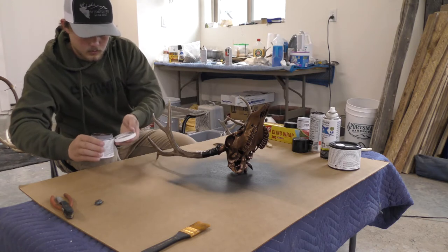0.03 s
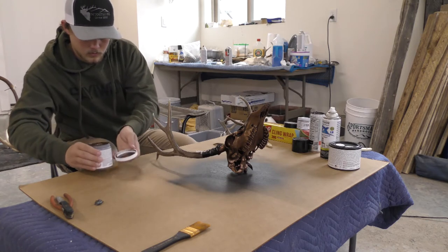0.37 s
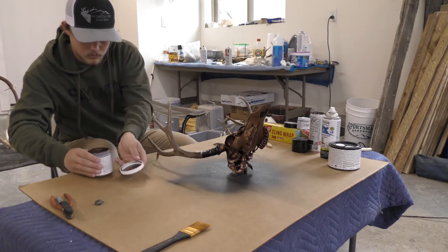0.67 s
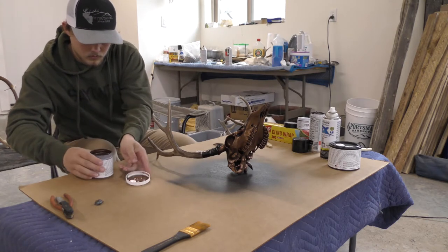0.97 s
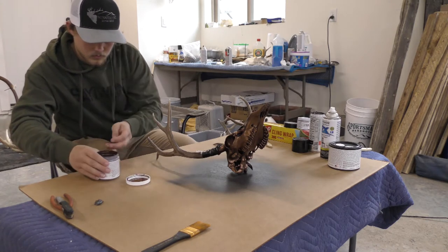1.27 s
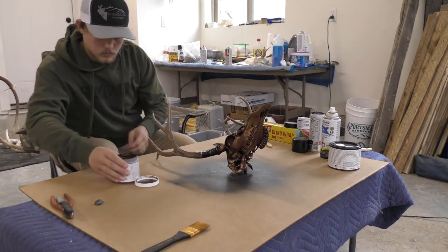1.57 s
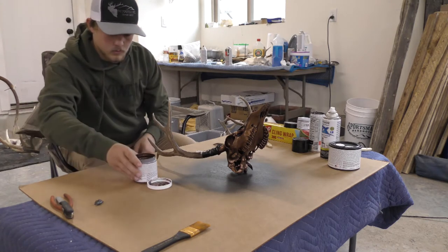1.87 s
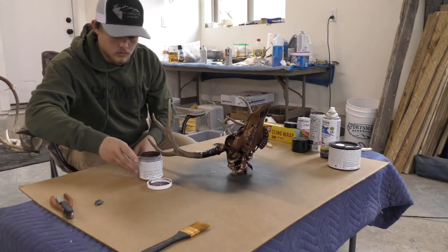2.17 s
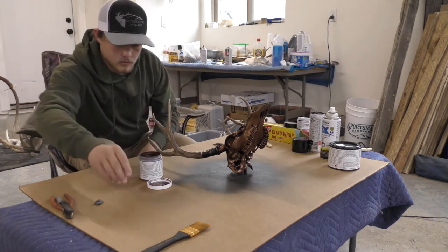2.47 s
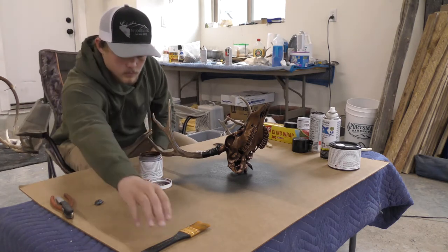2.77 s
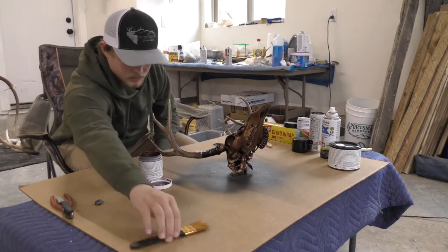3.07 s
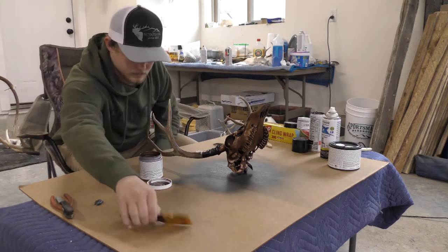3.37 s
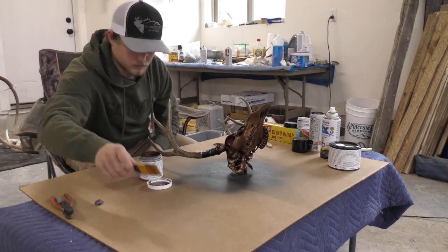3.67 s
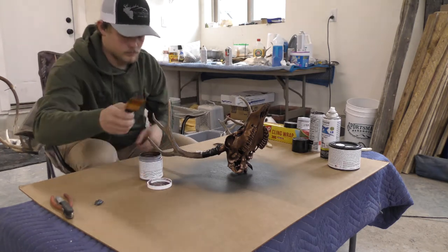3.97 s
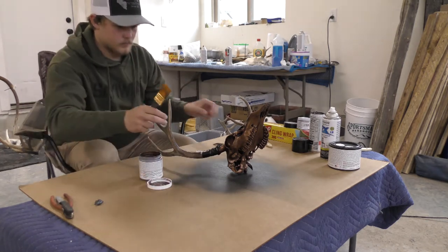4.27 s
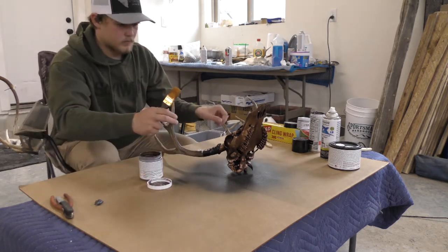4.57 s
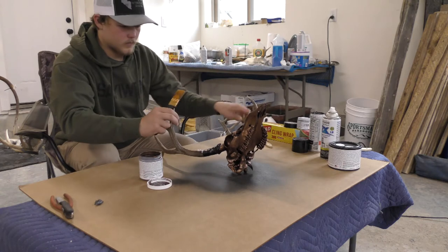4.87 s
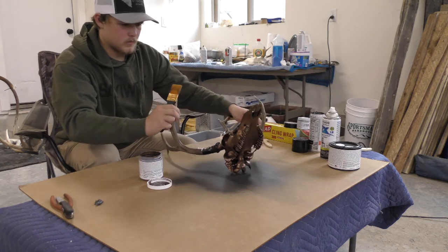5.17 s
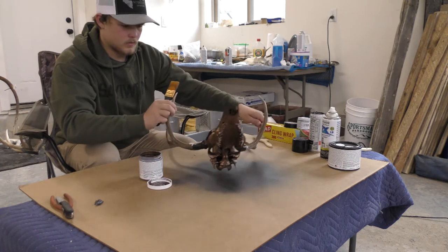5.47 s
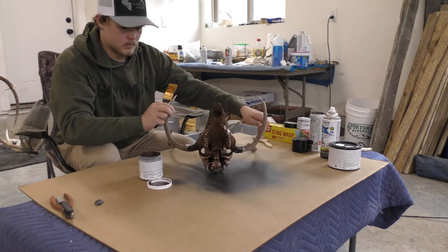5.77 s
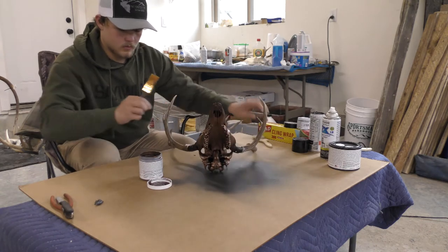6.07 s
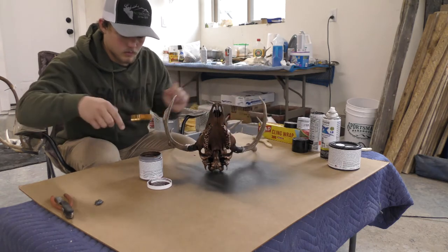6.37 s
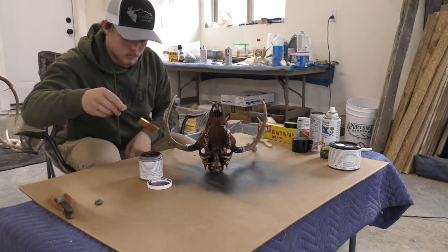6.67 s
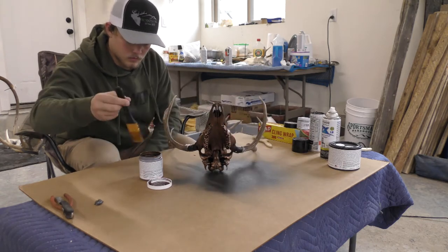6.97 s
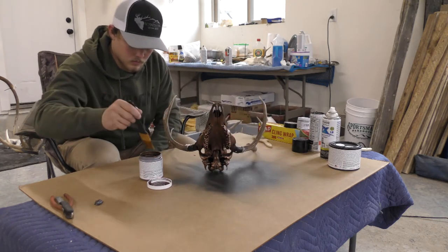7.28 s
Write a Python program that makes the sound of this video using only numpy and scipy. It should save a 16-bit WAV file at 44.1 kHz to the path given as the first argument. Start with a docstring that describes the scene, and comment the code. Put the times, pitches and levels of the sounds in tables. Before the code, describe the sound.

A paint tin and lid knock onto a paper-covered table, followed by sliding, a brush being picked up and an antlered skull scraping round.

```python
"""Over a faint fan, a small paint tin and its lid knock down on a paper-covered table in a bare workshop.
The tin slides aside, a sleeve reaches over, a brush is dragged off the paper and a boot scuffs;
then an antlered skull scrapes round, knocks and rocks the table.
Impacts excite the modes of the tabletop, and sliding friction makes noise from many tiny slips.
The room reverberates after every knock, and a limiter ducks the loudest ones."""
import sys
import numpy as np
from scipy import signal
from scipy.fft import rfft, irfft, next_fast_len
from scipy.io import wavfile
from scipy.ndimage import minimum_filter1d

SR = 44100
rng = np.random.default_rng(int(sys.argv[2]) if len(sys.argv) > 2 else 0)


def transcribe(u):
    """Save the signal u as a 16-bit wav file named by the first command-line argument.

    u: samples, shape (n,) or (channels, n), limited to [-1, 1]; the rate is SR.
    q: integer samples, one column per channel.
    """
    v = np.clip(np.atleast_2d(u).T, -1, 1)
    q = np.round(v * 32767).astype(np.int16)
    wavfile.write(sys.argv[1], SR, q)


N = 328086


def amp(db):
    """Amplitude ratio of a level in decibels."""
    return 10 ** (np.asarray(db) / 20)


def unit(x):
    """Normalisation to rms 1."""
    return x / np.sqrt(np.mean(x ** 2) + 1e-20)


def along(points, hz):
    """Interpolation of (f/Hz, value) points on a log frequency axis."""
    f, values = np.transpose(points)
    return np.interp(np.log(hz + 1), np.log(f + 1), values)


def filtered(x, response):
    """Linear filtering: the spectrum of x times a frequency response."""
    size = next_fast_len(len(x) + 4096, real=True)
    return irfft(rfft(x, size) * response(np.fft.rfftfreq(size, 1 / SR)), size)[:len(x)]


def coloured(x, spectrum):
    """Spectral shaping by (f/Hz, level/dB) points, at rms 1."""
    return unit(filtered(x, lambda hz: amp(along(spectrum, hz))))


def edge(x, hz, kind, order):
    """A causal high-pass or low-pass filter."""
    return signal.lfilter(*signal.butter(order, hz, kind, fs=SR), x)


def add(track, s, sound):
    """Superposition of a sound on the track, from s seconds."""
    start = round(s * SR)
    track[start:start + len(sound)] += sound[:N - start]


def room_tone(air_db=-46.0, fan_db=-50):
    """Stationary noise: broadband air, and a distant fan with broad resonances."""
    # air spectrum: f/Hz, level/dB
    air_spectrum = [(12, -40), (20, 3.5), (70, 0), (95, -6.5), (123, 1.5), (145, -4.5), (365, -9.5),
                    (469, -16), (510, -33), (637, -15), (1020, -8), (1110, -18.5), (1470, -19.5),
                    (2370, -26), (15800, -45.5)]
    # fan resonances: f/Hz, width/Hz, level/dB
    resonances = [(129.5, 63, -3.5), (300, 42, -10.5), (498, 280, -8.5), (950, 990, -16)]

    def humps(hz):
        return sum(amp(db) / (1 + (2 * (hz - centre) / width) ** 2) for centre, width, db in resonances)

    fan = unit(filtered(rng.standard_normal(N), humps))
    air = coloured(rng.standard_normal(N), air_spectrum)
    return amp(fan_db) * fan + amp(air_db) * air


def tabletop(t):
    """Impulse response of the board: the direct blow plus damped normal modes."""
    # modes of the table and the things on it: f/Hz, level/dB relative to the blow, t60/s
    modes = [(70, 7.5, 0.31), (133.7, 8.5, 0.15), (233.3, -1.5, 0.96), (382, -1, 0.078), (467, -12, 0.073),
             (626, -2, 0.32), (756, -5.5, 0.053), (930, -2.5, 0.34)]
    ring = sum(amp(db - 60 * t / t60) * 2 * np.log(1000) / (t60 * SR) * np.cos(2 * np.pi * hz * t)
               for hz, db, t60 in modes)
    return (t == 0) + ring


def contact_pulse(size=1024):
    """Hard contact as a minimum-phase pulse, the sharpest causal one for its spectrum; peak 1."""
    # spectrum of an edge striking: f/Hz, level/dB
    spectrum = [(300, -32), (1200, -3.5), (1800, 8.5), (2500, 5.5), (3400, 10), (4200, -7), (5200, -3.5),
                (6200, -7.5), (7900, -7.5), (10000, -17.5), (12500, -18), (16000, -36)]
    cepstrum = irfft(np.log(amp(along(spectrum, np.fft.rfftfreq(size, 1 / SR)))))
    pulse = irfft(np.exp(rfft(2 * cepstrum[:size // 2], size)))
    return pulse / np.abs(pulse).max()


def knocks(chatter_db=-28, chatter_t60=0.042, bounce_s=0.0085, wet_db=-9):
    """Inelastic impact: a thud, lower for heavy things, and an edge click, then one weaker rebound."""
    # blows of tin, lid, brush, arm and skull: t/s, thud level/dB, click level/dB, thud band low, high f/Hz
    blows = [(0.6358, -19, -34, 151, 279), (0.6384, -19, -20, 404, 1230), (0.8212, 10, -2.5, 400, 1150),
             (0.857, -14, -29, 395, 875), (1.0607, 5, 2, 446, 1070), (1.126, -25, -34, 460, 1100),
             (1.4989, -11, -25, 380, 1240), (2.992, 4.5, -10.5, 490, 1036), (3.012, -19, -41, 450, 950),
             (3.3579, -2.5, -20, 564, 772), (3.376, -5, -35, 490, 1020), (3.3849, -17, -44, 489, 990),
             (3.4359, -22, -34, 255, 950), (3.4405, -30, -20, 252, 1040), (3.7973, -24.5, -34, 70, 600),
             (3.809, -20.5, -37, 60, 288), (4.945, -21.5, -54, 350, 1300), (5.5672, -4, -24, 97, 840),
             (5.7212, -13.5, -37, 105, 870), (5.7876, -17.5, -49, 300, 800)]
    track, t = np.zeros(N), np.arange(SR // 4) / SR
    board, tick = tabletop(t), contact_pulse()
    for s, thud_db, click_db, low_hz, high_hz in blows:
        thud = edge(edge(board, low_hz, "high", order=2), high_hz, "low", order=4)
        thud = amp(thud_db) * thud / np.abs(thud).max()
        rim_chatter = amp(chatter_db - 60 * t / chatter_t60) * rng.standard_normal(len(t)) / 2
        click = amp(click_db) * signal.fftconvolve((t == 0) + rim_chatter, tick)[:len(t)]
        rebound = amp(-15) * thud + amp(-21) * click
        add(track, s, in_room(thud + click, wet_db))
        add(track, s + bounce_s, in_room(rebound, wet_db))
    return track


def in_room(x, wet_db, build_s=0.00088):
    """Reverberation: direct sound plus a diffuse tail whose decay rate depends on frequency."""
    # reverberation time: f/Hz, t60/s
    decay = [(100, 1), (400, 0.74), (900, 0.73), (3000, 0.95), (6000, 0.82), (14000, 0.93)]
    # initial spectrum of the tail: f/Hz, level/dB
    colour = [(60, 0.5), (250, -1), (420, 2), (600, 6.5), (950, 1), (1400, 1), (3300, -0.5), (5000, 3.5),
              (7000, -0.5), (9000, -11.5), (15000, -9)]
    hz, t = np.fft.rfftfreq(256, 1 / SR)[:, None], np.arange(256) * 128 / SR
    noise = rng.standard_normal((len(hz), len(t))) + 1j * rng.standard_normal((len(hz), len(t)))
    tail = signal.istft(noise * amp(along(colour, hz) - 60 * t / along(decay, hz)))[1]
    tail *= 1 - np.exp(-np.arange(len(tail)) / SR / build_s)
    response = amp(wet_db) * tail / np.linalg.norm(tail)
    response[0] += 1  # direct path
    return signal.fftconvolve(x, response)


def clacks(t60=0.0099, rise_s=0.0006, overtone_ratio=1.264, overtone_db=-5, wet_db=-9):
    """Damped free vibration: small hard parts ring in two modes, quickly stilled by the hand."""
    # strikes of rim, ferrule and antler tine: t/s, f/Hz, level/dB
    strikes = [(0.6386, 2730, -20.5), (1.0608, 2755, 2), (2.059, 2960, -16.5), (3.4417, 3050, -15),
               (5.5283, 2780, -26.5), (5.7218, 3700, -35), (5.788, 2340, -31)]
    track, t = np.zeros(N), np.arange(SR // 16) / SR
    for s, hz, db in strikes:
        phase = 2 * np.pi * hz * t
        modes = np.sin(phase) + amp(overtone_db) * np.sin(overtone_ratio * phase)
        envelope = amp(db - 60 * t / t60) * (1 - np.exp(-t / rise_s))
        add(track, s, in_room(envelope * modes, wet_db))
    return track


def grains(count, rate, spread_db):
    """Shot noise: tiny slips of random size and sign, on average rate a second."""
    size = amp(spread_db * np.clip(rng.standard_normal(count), -2, 2))
    return (rng.random(count) < rate / SR) * rng.choice([-1, 1], count) * size


def catching(t, rate, depth_db):
    """Random amplitude modulation: a surface catches and lets go, rate times a second."""
    knots = np.clip(rng.standard_normal(1024), -1.5, 1.5)
    return amp(depth_db * np.interp(t * rate, np.arange(len(knots)), knots))


def rub(strokes, body, surface, slip_rate, grit_rate, spread_db, catch_db, uneven_db,
        body_db, rasp_db, fizz_db, wet_db, fizz_hz=7000, fizz_damping=0.13):
    """Stick-slip friction: coarse slips shake the body, grit rasps on the surface, fine fibres fizz."""
    track, t = np.zeros(N), np.arange(SR // 2) / SR
    for s, length, rise, fall, level_db, pressure_db in strokes:
        glide = np.clip(np.minimum(t / rise, (length - t) / fall), 0, 1)
        speed = glide * catching(t, rate=41.7, depth_db=uneven_db)  # the motion wavers
        slips = coloured(grains(len(t), slip_rate, spread_db), body)
        grit = grains(len(t), grit_rate, spread_db) * catching(t, rate=140, depth_db=catch_db)
        grit = coloured(grit, surface)
        coarse = unit(edge(grit, fizz_hz, "low", order=4))
        fine = unit(edge(grit, fizz_hz, "high", order=4))
        # pressure strengthens the judder and flattens the fibres that fizz
        judder = amp(body_db + pressure_db) * speed ** 0.61 * slips
        rasp = amp(rasp_db) * speed * coarse
        fizz = amp(fizz_db - fizz_damping * pressure_db) * speed ** 1.06 * fine
        add(track, s, in_room(amp(level_db) * (judder + rasp + fizz), wet_db))
    return track


def tin_slide():
    """Friction on paper drives the resonances of the tin."""
    # strokes: t/s, length/s, rise/s, fall/s, level/dB, pressure/dB
    strokes = [(0.86, 0.073, 0.0096, 0.051, -30.5, 17), (0.91, 0.21, 0.02, 0.13, -35, 0),
               (1.112, 0.039, 0.036, 0.014, -35, 25), (1.19, 0.35, 0.1, 0.095, -32.5, 4.5),
               (1.497, 0.14, 0.0029, 0.1, -28, 7), (1.585, 0.22, 0.057, 0.046, -28.5, 6.5),
               (1.74, .14, 0.066, 0.075, -31, 10), (1.81, .325, 0.11, .1, -30.5, -3.5)]
    # body and surface spectra: f/Hz, level/dB
    body = [(60, -41), (130, -8), (280, -13.5), (380, -5), (590, -9), (820, -6), (940, 2.5), (1060, -6.5),
            (1200, -9.5), (1900, -19), (2600, -20.5), (4000, -70)]
    surface = [(820, -28), (1400, -8.5), (1520, -14), (1820, -12.5), (2940, -11.5), (3490, -14),
               (4100, -22), (4970, -23.5), (5970, -31), (12100, -33), (15800, -41)]
    return rub(strokes, body, surface, slip_rate=1300, grit_rate=2700, spread_db=1.0, catch_db=-0.4,
               uneven_db=0.0, body_db=-6.0, rasp_db=-6.0, fizz_db=-23.5, wet_db=-7)


def crinkles(t60=0.012, above_hz=8000):
    """Noise transients: paper snaps brightly under a shifting weight."""
    # snaps: t/s, level/dB
    snaps = [(1.444, -37), (1.646, -37), (5.639, -44), (5.723, -47)]
    track, t = np.zeros(N), np.arange(SR // 32) / SR
    for s, db in snaps:
        hiss = unit(edge(rng.standard_normal(len(t)), above_hz, "high", order=2))
        add(track, s, amp(db - 60 * t / t60) * hiss)
    return track


def sleeve_rustle():
    """Friction of cloth: dense slips merge into a soft hiss."""
    # strokes: t/s, length/s, rise/s, fall/s, level/dB, pressure/dB
    strokes = [(2.56, 0.18, 0.04, 0.17, -47, 4.5), (2.66, 0.13, 0.026, 0.073, -44, -13),
               (2.71, 0.34, 0.13, 0.18, -41, 4), (3.797, 0.14, 0.01, 0.12, -45, 2.5),
               (6.68, 0.25, 0.049, 0.076, -56, -13)]
    # body and surface spectra: f/Hz, level/dB
    body = [(71, -30), (120, 7), (269, -10), (328, -2.5), (503, -9), (876, -1.5), (1900, -25), (2470, -35),
            (4180, -120)]
    surface = [(880, -2.5), (1500, -5.5), (3050, -2.5), (3820, 0.5), (4700, -6.5), (5670, -10.5),
               (6770, -10.5), (7330, -11), (12400, -8), (14300, -16), (15800, -6)]
    return rub(strokes, body, surface, slip_rate=2000, grit_rate=9000, spread_db=2.5, catch_db=1.0,
               uneven_db=-3.5, body_db=-4.5, rasp_db=-0.5, fizz_db=-16.5, wet_db=-7.0)


def brush_drag():
    """Friction of a brush on paper: slips of very unequal size give a grainy rasp."""
    # strokes: t/s, length/s, rise/s, fall/s, level/dB, pressure/dB
    strokes = [(3.035, 0.13, 0.049, 0.02, -36.5, 7.4), (3.14, 0.15, 0.07, 0.095, -34, 4.2),
               (3.27, 0.18, 0.021, 0.082, -39, 14.6), (3.41, 0.041, 0.056, 0.012, -34.5, 11.3)]
    # body and surface spectra: f/Hz, level/dB
    body = [(88, -29), (150, -12.5), (269, -17), (399, -9.5), (511, -5), (699, -3.5), (926, -0.5),
            (991, -7.5), (1370, -18), (2200, -23), (2860, -51), (4840, -120)]
    surface = [(1060, -17), (1800, -4), (1950, 0), (3110, -0.5), (3370, -3), (4150, -8), (4670, -9),
               (6540, -21.5), (8520, -27.5), (10700, -21.5), (15800, -32)]
    return rub(strokes, body, surface, slip_rate=1500, grit_rate=4500, spread_db=4.5, catch_db=-0.5,
               uneven_db=-0.5, body_db=3, rasp_db=-1.0, fizz_db=-7, wet_db=-9.0)


def boot_scuff():
    """Friction under heavy load: a boot judders over concrete."""
    # strokes: t/s, length/s, rise/s, fall/s, level/dB, pressure/dB
    strokes = [(4.386, 0.055, 0.024, 0.019, -31.5, 11.6), (4.428, 0.14, 0.0093, 0.14, -34, 15.4)]
    # body and surface spectra: f/Hz, level/dB
    body = [(29, -46), (50, -10.5), (206, 1), (335, -15.5), (396, 1.5), (513, -9.5), (675, 0.5),
            (786, -4.5), (901, 1.5), (1150, -12.5), (1260, -7.5), (1900, -14.5), (2470, -45), (4180, -120)]
    surface = [(880, -25), (1500, -8), (1690, -7), (1940, 6), (2100, 8.5), (2660, 3.5), (2960, 7),
               (4260, -6.5), (4840, -10.5), (5900, -23), (6380, -20), (7180, -34.5), (11100, -42),
               (15800, -52)]
    return rub(strokes, body, surface, slip_rate=1000, grit_rate=3300, spread_db=0.6, catch_db=-1.0,
               uneven_db=0.1, body_db=-4.5, rasp_db=-2.5, fizz_db=-3, wet_db=-11.0)


def skull_scrape():
    """Friction of bone on paper as the skull turns at an uneven speed."""
    # strokes: t/s, length/s, rise/s, fall/s, level/dB, pressure/dB
    strokes = [(4.932, 0.16, 0.049, .05, -41, 11), (5.03, .2, .05, 0.1, -40, 4.5),
               (5.75, 0.12, 0.033, 0.081, -49.5, 8.5), (5.97, 0.076, 0.04, 0.037, -53, 1)]
    # body and surface spectra: f/Hz, level/dB
    body = [(59, -43), (100, -5), (199, -5), (314, -10.5), (490, -1), (853, 2), (1100, -5), (1900, -30),
            (2470, -27), (4180, -120)]
    surface = [(900, -18), (1550, 6), (2100, -2.5), (2680, -7), (3020, -2), (3280, -6), (3580, 1.5),
               (3950, -16), (4400, -12), (4560, -8), (4750, -16), (5650, -21), (6350, -22.5), (7050, -36),
               (7600, -19), (7900, -27), (8450, -22), (8900, -35), (9400, -28), (12000, -35), (15800, -45)]
    return rub(strokes, body, surface, slip_rate=1400, grit_rate=4000, spread_db=3.0, catch_db=0.8,
               uneven_db=-2.5, body_db=-1.5, rasp_db=-0.5, fizz_db=-20, wet_db=-11.5)


def table_sway(rock_hz=25.7, rise_s=0.03, t60=0.99):
    """Damped oscillation: the whole table rocks under the turning skull and settles."""
    # shoves: t/s, level/dB
    shoves = [(5.567, -26), (5.78, -26)]
    envelope, t = np.zeros(N), np.arange(N) / SR
    for s, db in shoves:
        add(envelope, s, amp(db - 60 * t / t60) * (1 - np.exp(-t / rise_s)))
    return envelope * np.sin(2 * np.pi * rock_hz * t)


def scene():
    """Superposition of all sources at one point."""
    impacts = knocks() + clacks()
    friction = tin_slide() + brush_drag() + boot_scuff() + skull_scrape() + sleeve_rustle()
    return (impacts + friction + crinkles() + table_sway() + room_tone())[None]


def limited(x, threshold=1.31, attack_s=0.00036, hold_s=0.022, release_s=0.047, ceiling=0.99):
    """Peak limiting: the gain drops, holds and recovers; what still exceeds the ceiling is clipped."""
    size = int(hold_s * SR) | 1
    excess = np.log(np.maximum(np.abs(x) / threshold, 1) + 1e-12)
    held = -minimum_filter1d(-excess, size, origin=size // 2)  # running maximum
    fade = np.arange(N) / SR / release_s
    released = np.exp(np.maximum.accumulate(np.log(held) + fade) - fade)
    lag = np.exp(-1 / (attack_s * SR))
    reduction = signal.lfilter([1 - lag], [1, -lag], released)
    return np.clip(x * np.exp(-reduction), -ceiling, ceiling)


def record(dry, top_hz=15850):
    """Peak limiting, then band limiting with an edge 500 Hz wide."""
    return filtered(limited(dry[0]), lambda hz: np.clip((top_hz - hz) / 500 + .5, 0, 1))[None]


dry = scene()
out = record(dry)
transcribe(out)
```